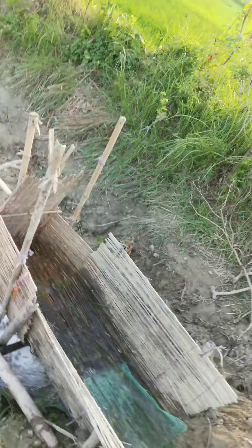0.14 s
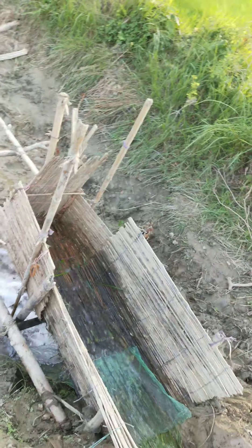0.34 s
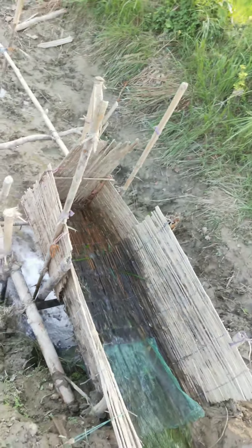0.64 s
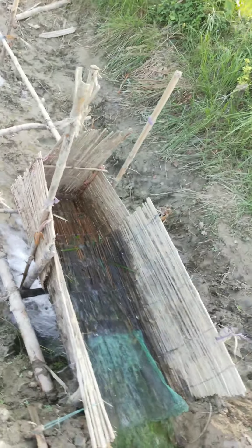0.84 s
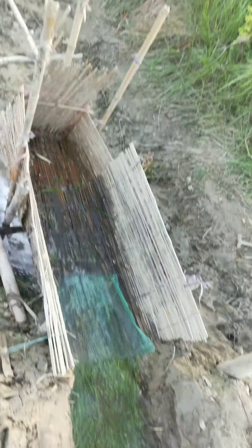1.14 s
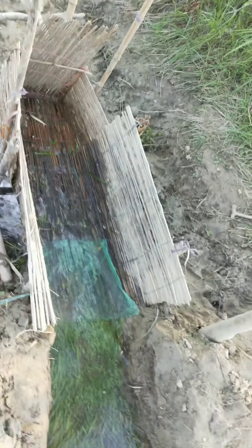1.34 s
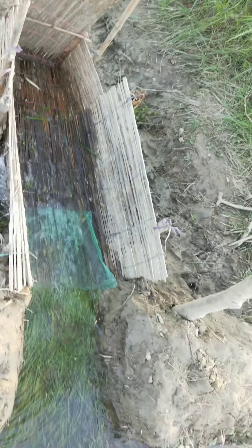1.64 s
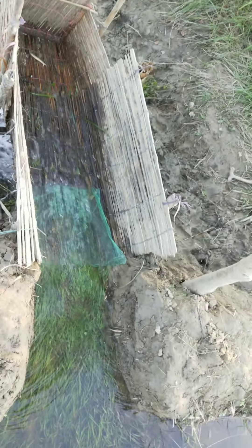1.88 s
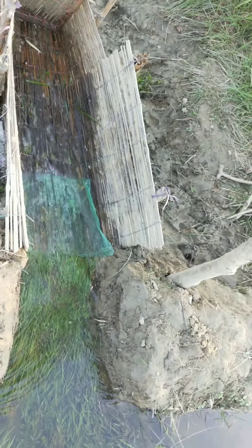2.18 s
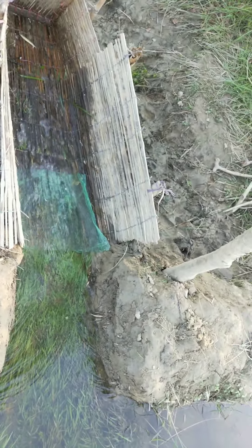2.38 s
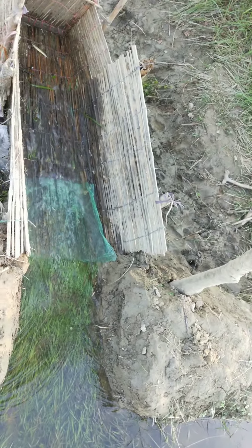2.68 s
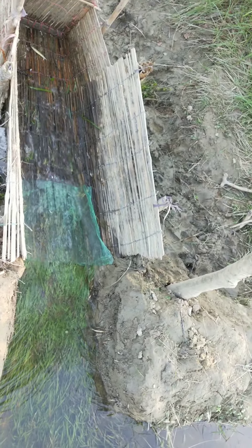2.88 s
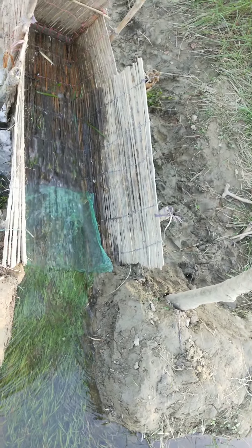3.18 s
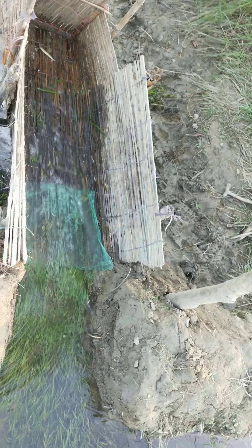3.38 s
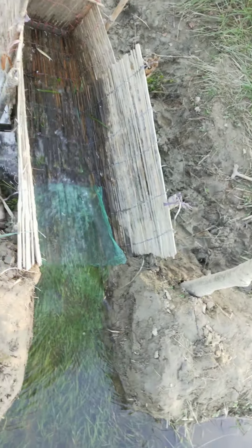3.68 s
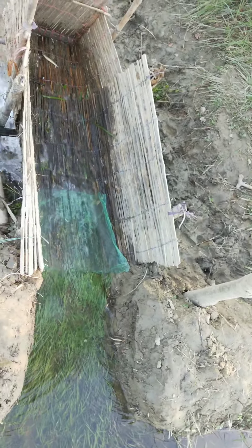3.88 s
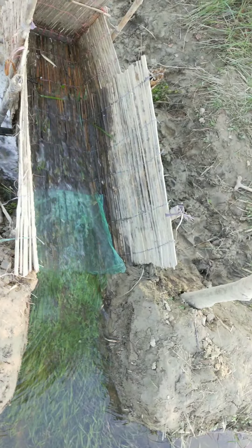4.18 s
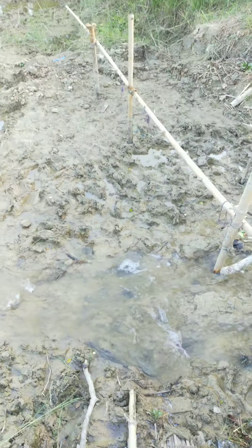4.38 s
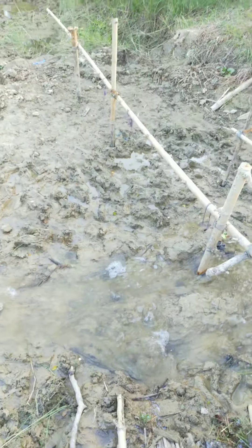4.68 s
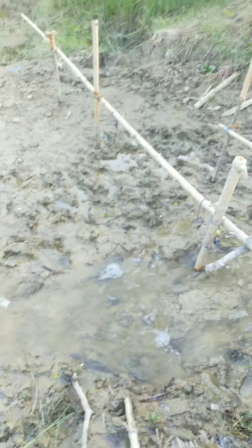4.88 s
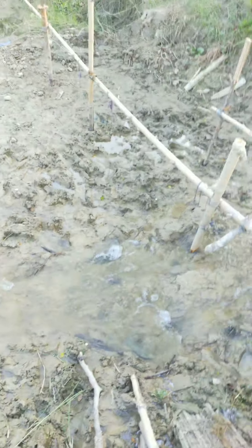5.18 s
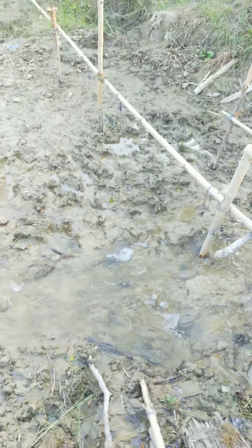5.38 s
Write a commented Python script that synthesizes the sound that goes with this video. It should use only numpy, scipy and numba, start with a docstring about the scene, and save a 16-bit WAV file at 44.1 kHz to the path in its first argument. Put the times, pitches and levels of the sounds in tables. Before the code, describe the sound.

From the start, water rushes steadily through a narrow reed-mat channel outdoors, heard from close above. It is a dense, bright wash of tiny splashes and fizzing bubbles over a low gurgle that gently swells and sinks. Small drops plink and air pockets gulp throughout, with slightly harder spatters between about 1.4 and 1.8 seconds. The tone shifts a little at around 1 to 1.5 seconds as the microphone moves over the channel. A light breeze buffets the microphone, mostly on the right, with low rumbles and dull thumps clustered from 1.9 to 2.5 seconds, again near 3.5, and more faintly near 4.2 and 4.9. At about 4.3 seconds the sound cuts off abruptly. From about 4.45 it swells back in beside a muddy ditch, still rushing but gurgling a little less, with a few more plinks until the end at 5.5 seconds.

```python
"""Water rushing through a paddy channel

Thousands of bubbles and splashes a second, each a damped sine, merge into a steady rush in a narrow
reed-mat channel. A few drops plink, and a breeze buffets the two ports of a microphone held above it.
The sound cuts out for a moment and fades back in beside the muddy ditch, where the water gurgles less."""
import sys
import numpy as np
from scipy import signal
from scipy.fft import rfft, irfft
from scipy.io import wavfile
from numba import njit

SR = 44100
rng = np.random.default_rng(int(sys.argv[2]) if len(sys.argv) > 2 else 0)


def master_out(mix):
    """Clip the mix to full scale and print it as 16-bit PCM to the path in sys.argv[1]."""
    frames = np.transpose(np.atleast_2d(mix))
    ceiling = np.clip(frames, -1, 1)
    pcm = np.round(ceiling * 32767).astype(np.int16)
    wavfile.write(sys.argv[1], SR, pcm)


N = 244090
TIME = np.arange(N) / SR
FREQ = np.maximum(np.arange(N // 2 + 1) * SR / N, 1)
TOP_HZ = 15850


# The tone of the water. Each row: frequency in Hz, then gain in dB at the head of the channel,
# over the channel and at the ditch.
WATER_EQ = [(30, -53, -56, -57), (49.8, -45.5, -46, -44), (107, -35, -36.5, -33), (170, -34.5, -34, -30),
            (297, -26.5, -27, -31), (446, -30.5, -30.5, -33.5), (570, -30, -30, -28),
            (680, -28.5, -37, -31.5), (960, -31, -28.5, -30), (1155, -33, -31.5, -31.5),
            (1610, -28.5, -26, -28), (1970, -30.5, -36, -26), (2920, -28.5, -31, -30.5),
            (4900, -35, -36.5, -36), (15200, -40, -63, -50)]

def rush():
    """Short splashes, fizzing bubbles and a long-ringing burble, toned by where the microphone is."""
    splashes = swarm(250000, 40.7, TOP_HZ, cycles=5, rise=0, scatter_db=1, churn_db=1, lag_ms=0.055)
    fizz = swarm(42000, 217.4, TOP_HZ, cycles=24, rise=0.21, scatter_db=1.13, churn_db=1.1, lag_ms=0.05)
    burble = swarm(2400, 329.7, 3023, cycles=91, rise=0.086, scatter_db=1.5, churn_db=-0.5, lag_ms=0.044)
    return at_place(undb(-4) * splashes + undb(-5.5) * fizz + undb(-13.5) * burble, WATER_EQ)


# The low gurgle swells and sinks with the flow. Each row: time in seconds, relative level in dB.
GURGLE_SWELL = [(0, 0.5), (.7, 1.5), (1, 2), (1.7, 1), (2.3, 0.5), (3.15, 2.6), (3.7, 1.8), (3.95, 2.5),
                (4.6, 0), (5.53, -0.2)]

def swarm(count, low_hz, high_hz, cycles, rise, scatter_db, churn_db, lag_ms):
    """A stereo cloud of ringing bubbles and splashes from spots spread over the water, at unit rms."""
    when, pitch, strength, ring_time, polarity, spot = rng.random((count, 6)).T
    t = when * N / SR
    hz = (np.sqrt(low_hz) + pitch * (np.sqrt(high_hz) - np.sqrt(low_hz))) ** 2  # mostly small bubbles
    gurgle_db, = curves(GURGLE_SWELL, t)
    splash_db, surge_db = -1.57, 0.9
    small = np.clip(np.log2(hz / 700), 0, 1)  # 0 for gurgle, 1 for small splashes
    flow = gurgle_db + small * (splash_db - gurgle_db) + surge_db * walk(t, per_second=5.64)
    coarse = 1 / (1 + (hz / 7000) ** 2)  # the finest spray stays smooth
    churn = churn_db * (0.6 * walk(t, 14) + walk(t, 50)) * coarse  # the flow tumbles unevenly
    scatter = -scatter_db * np.log(strength + 0.01) * coarse  # a few grains stand out, most are faint
    db = flow + churn + scatter + spurts(t, hz)
    size = np.sign(polarity - 0.5) * undb(db) * hz ** 0.75  # the tilt evens out the spectrum
    lag = port_lag(t, hz, spot, lag_ms)
    ports = [ring(t + side * lag / 2, hz, cycles * (0.5 + ring_time), size, rise) for side in (1, -1)]
    return unit(np.array(ports))


# Moments of harder spatter. Each row: centre in seconds, length in seconds, pitch in Hz, boost in dB.
SPATTER_SPURTS = [(.3, 0.76, 720, 1.5), (.77, 0.074, 5300, 2), (1.37, 0.079, 2290, 3.5),
                  (1.493, 0.087, 2490, 3.5), (1.78, .08, 2500, 4), (3.95, .25, 2490, 0.5),
                  (4.75, 0.15, 5380, 3)]

def spurts(t, hz, octaves=0.68):
    """The water briefly spatters harder: extra dB for grains near a spurt in time and in pitch."""
    return sum(db * np.exp(-(2 * (t - centre) / length) ** 2 - (np.log2(hz / pitch) / octaves) ** 2)
               for centre, length, pitch, db in SPATTER_SPURTS)


# The microphone's move. Each row: time in seconds, place (0 head, 1 channel, 2 ditch), left-port lag
# in ms for the splashing, the same for the gurgle, boost of the left port's hollow in dB.
MIC_PATH = [(0, 0, -0.17, -0.28, 6), (1.05, 0.13, -0.092, -0.11, 8.5), (1.55, 0.54, 0.13, -0.022, 9),
            (3.3, 0.58, 0.15, -0.021, 10), (4.3, 0.58, 0.085, .01, 8.5), (4.44, 1.73, -0.17, -.08, 4),
            (5.53, 2.03, -0.087, -0.051, 2.5)]

def port_lag(t, hz, spot, near_ms, stray_share=0.24, stray_ms=0.427):
    """The water is wide, so each grain reaches the left port with its own lag, in seconds."""
    _, splash_ms, gurgle_ms, _ = curves(MIC_PATH, t)
    gurgle = hz < 574  # the low gurgle comes from one spot
    stray = (spot < stray_share) & ~gurgle  # splashes far off to the sides
    centre_ms = np.where(gurgle, gurgle_ms, splash_ms)
    spread_ms = np.where(stray, stray_ms, near_ms)
    return (centre_ms + spread_ms * rng.laplace(size=len(t))) / 1000


def at_place(x, eq):
    """Crossfade between the three EQ curves as the microphone moves from place to place."""
    place = curves(MIC_PATH, TIME)[0]
    return sum(np.maximum(1 - abs(place - k), 0) * toned for k, toned in enumerate(colour(x, eq)))


# Plinks and gulps. Each row: start in seconds, pitch in Hz, level in dB, cycles of ringing.
PLINKS = [(0.149, 280, -36.5, 20), (.172, 448, -31, 27), (.242, 1290, -33.5, 35), (.245, 667, -33.5, 60),
          (.351, 2088, -30, 34), (0.364, 2620, -31, 48), (0.376, 338, -41, 43), (.483, 530, -33.5, 34),
          (0.615, 290, -37, 28), (0.755, 400, -27.5, 10), (.756, 5200, -30.5, 30), (0.772, 540, -34, 64),
          (0.862, 266, -31.5, 9), (1.053, 1162, -38, 35), (1.124, 882, -37.5, 33), (1.371, 1840, -28, 35),
          (1.49, 1450, -32, 28), (1.532, 430, -31, 25), (1.584, 470, -31.5, 49), (1.587, 2680, -29.5, 35),
          (1.665, 290, -34.5, 20), (1.706, 2170, -27.5, 32), (1.707, 2720, -26, 32), (1.727, 354, -34, 20),
          (1.761, 490, -36, 43), (1.790, 418, -31, 25), (1.92, 310, -35.5, 34), (2.500, 326, -35.5, 48),
          (2.605, 2460, -27.5, 52), (2.692, 2520, -27, 28), (2.709, 240, -26.5, 12), (2.730, 460, -40, 30),
          (2.813, 322, -29.5, 16), (2.868, 1033, -33, 39), (3.15, 465, -31, 33), (3.189, 300, -28.5, 22),
          (3.453, 353, -32.5, 33), (3.496, 336, -31, 30), (3.597, 2350, -31, 35), (3.850, 320, -32.5, 56),
          (3.981, 317, -32.5, 41), (4.150, 1360, -28.5, 22), (4.995, 1360, -32, 31), (5.322, 2840, -38, 40),
          (5.372, 1690, -39, 35), (5.433, 2024, -29, 45)]

def drops(low_cut_hz=196):
    """Near drops and large air pockets ring out above the rush, bending slightly up in pitch."""
    start, hz, db, cycles = np.transpose(PLINKS).copy()
    plinks = ring(start, hz, cycles, undb(db), rise=0.054)
    return signal.sosfilt(signal.butter(3, low_cut_hz, "high", fs=SR, output="sos"), plinks)


# Gusts on the ports. Each row: start in seconds, length in seconds, level in dB, left minus right in dB.
WIND_GUSTS = [(0.39, 0.06, -54, -8), (0.865, 0.044, -50, -11), (1.035, 0.099, -48.5, -12),
              (1.25, 0.27, -54, -18), (1.644, 0.086, -50.5, 11), (1.88, 0.34, -51, -7),
              (2.174, 0.14, -45, -19), (2.37, 0.12, -46, -20), (3.377, 0.044, -50, -26),
              (3.537, 0.15, -46, -18), (3.843, 0.048, -51, -12), (4.02, 0.27, -57.5, -6),
              (4.618, 0.21, -54, -19), (4.879, 0.14, -53, -4), (5.34, 0.13, -50, -25)]
# The light air between gusts. Each row: time in seconds, level in dB.
LIGHT_AIR = [(0, -68), (.4, -68), (.65, -81), (.95, -67), (2.45, -62), (2.7, -81), (3.25, -80), (3.55, -70),
             (4.25, -61.5), (4.6, -69), (5.53, -68)]
# The rumble of the buffeting. Each row: frequency in Hz, relative gain in dB.
BUFFET_EQ = [(15, -9), (35, -2), (60, 5.5), (105, 6.5), (160, -5.5), (260, -27), (600, -52.5), (2000, -91)]

def breeze(attack_s=0.0059, release_s=0.066, wander_db=4):
    """Eddies buffet each port on its own, mostly the right; gusts rise, hold and die over light air."""
    air_db = curves(LIGHT_AIR, TIME)[0] + wander_db * walk(TIME, per_second=5.6)
    power = (panned(-15.5) * undb(air_db)) ** 2
    for start, length, db, pan_db in WIND_GUSTS:
        attack = np.clip((TIME - start) / attack_s, 0, 1)
        release = np.exp(-np.maximum(TIME - start - length, 0) / release_s)
        power += (panned(pan_db) * undb(db) * attack * release) ** 2
    eddies, = colour(rng.standard_normal((2, N)), BUFFET_EQ)
    return unit(eddies) * np.sqrt(power)


# Wind thumps. Each row: start in seconds, pitch in Hz, level in dB, cycles of ringing.
EDDY_THUMPS = [(1.909, 85, -31, 6), (2.191, 105, -24, 4.6), (2.213, 234, -32, 12), (2.231, 85, -25, 5.5),
               (2.255, 90, -21, 4), (2.287, 105, -23.5, 4.9), (2.391, 65.6, -26.5, 7),
               (2.454, 200, -22, 6.5), (3.538, 130, -26.5, 4.9), (3.553, 102, -21, 4.6),
               (4.168, 124, -28, 6.6), (4.883, 145, -30, 7), (4.982, 102, -31, 7.6)]

def wind_thumps(pan_db=-20, high_cut_hz=350):
    """The strongest eddies land on the right port as separate dull thumps."""
    start, hz, db, cycles = np.transpose(EDDY_THUMPS).copy()
    thumps = ring(start, hz, cycles, undb(db), rise=0)
    dulled = signal.sosfilt(signal.butter(2, high_cut_hz, fs=SR, output="sos"), thumps)
    return panned(pan_db) / 2 * dulled


@njit
def ring(start, hz, cycles, size, rise):
    """Damped sines that fall 60 dB in the given cycles while their pitch climbs by the fraction rise."""
    out = np.zeros(N)
    for k in range(len(start)):
        first = int(np.ceil(start[k] * SR))
        length = cycles[k] * SR / hz[k]
        step = 2j * np.pi * hz[k] / SR - np.log(1000.) / length
        phasor = size[k] * np.exp(step * (first - start[k] * SR))  # onset falls between samples
        turn = np.exp(step)
        glide = np.exp(1j * step.imag * rise / length)
        for i in range(first, min(first + int(length) + 1, N)):
            if i >= 0:
                out[i] += phasor.imag
            phasor *= turn
            turn *= glide
    return out


def undb(db):
    """Decibels to gain."""
    return 10 ** (np.asarray(db) / 20)


def unit(x):
    """Scale to an rms of one."""
    return x / np.sqrt(np.mean(x ** 2))


def curves(table, t):
    """A table's automation curves, read at the times t."""
    seconds, *columns = np.transpose(table)
    return [np.interp(t, seconds, column) for column in columns]


def colour(x, eq):
    """One filtered copy of the sound for each dB column of an EQ table."""
    hz, *columns = np.transpose(eq)
    spectrum = rfft(x)
    return [irfft(spectrum * undb(np.interp(np.log(FREQ), np.log(hz), db)), N) for db in columns]


def walk(t, per_second):
    """A random wobble with a spread of about one, gliding from value to value."""
    steps = rng.standard_normal(2048)
    return 1.22 * np.interp(t * per_second, np.arange(len(steps)), steps)


def panned(pan_db):
    """Left and right gains for a left-minus-right level difference."""
    share = undb(np.array([[pan_db], [-pan_db]]) / 2)
    return 2 * share / np.sqrt(np.sum(share ** 2))


def scene():
    """Water and breeze at the two ports."""
    return rush() + drops() + breeze() + wind_thumps()


def port_hollow(x, hz=2476, stage_width_hz=836):
    """A hollow at the port rings as a two-stage resonance, strongest over the channel."""
    resonance = 1 / (1 + 1j * (FREQ - hz ** 2 / FREQ) / stage_width_hz)
    ringing = irfft(rfft(x) * resonance ** 2, N)
    boost_db = curves(MIC_PATH, TIME)[3]
    return x + (undb(boost_db) - 1) * ringing


def dropout(cut_s=4.284, return_s=4.447, decay_s=0.0044, swell_s=0.21):
    """Gain that cuts the sound off abruptly, then lets it swell back after a short near-silence."""
    dying = undb(-17.5) * np.exp(-np.maximum(TIME - cut_s, 0) / decay_s)
    rising = 1 - (1 - undb(-20.5)) * np.exp(-np.maximum(TIME - return_s, 0) / swell_s)
    return np.select([TIME < cut_s, TIME < return_s], [1, dying + undb(-73)], rising)


# The tone of each port as the microphone turns. Each row: frequency in Hz, then gain in dB at the
# head of the channel, over the channel and at the ditch.
LEFT_PORT_EQ = [(400, -4.5, -7, -4), (1500, -3, -4.5, -3), (2000, -0.5, -5, -6), (2840, -4.5, -4, -5.5),
                (4050, -5.5, -1, -7), (4750, 4.8, 5, 0.5), (5330, 11.5, 2.5, 9), (6160, 2, 2.5, 3.5),
                (6650, -7, -1.5, -9), (8060, -9.5, -10.5, -1.5), (8940, -9, -33.5, -28),
                (10560, -7, -4.5, -1), (11600, -4.5, -29.5, -9), (13300, -1.5, -0.5, 7),
                (14500, 2.5, 7.5, 9.5)]
RIGHT_PORT_EQ = [(1540, -4.5, -5.5, -4), (2020, -3.5, -2.5, -7), (2800, -6.5, -5, -2), (4330, -6, -7, -5.5),
                 (4730, 1.5, 8, 3), (5260, 4.5, 8.5, 7.5), (6120, -6.5, 4, 2), (6820, -6.5, -11, -0.5),
                 (7550, -8, -0.5, -11), (9000, -21, -13.5, -17), (11170, -19.5, -7.5, -30),
                 (13100, -8.5, -5, -18), (14160, -0.5, 8, 6)]

def record(dry):
    """The ports colour the sound, the left one rings, the level drops out once and the top is cut."""
    left = port_hollow(at_place(dry[0], LEFT_PORT_EQ))
    right = at_place(dry[1], RIGHT_PORT_EQ)
    faded = np.array([left, right]) * dropout()
    return signal.sosfilt(signal.ellip(10, 0.2, 70, TOP_HZ, fs=SR, output="sos"), faded)


dry = scene()
out = record(dry)
master_out(out)
```